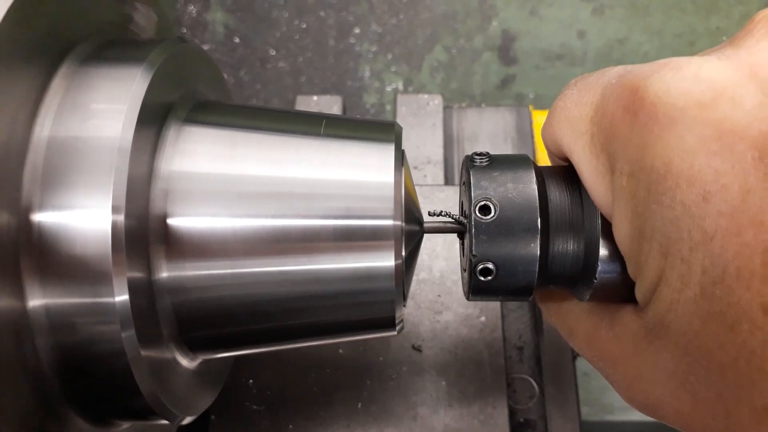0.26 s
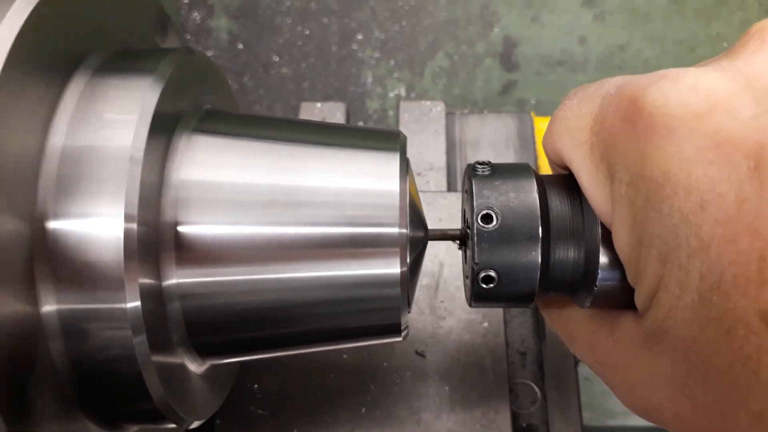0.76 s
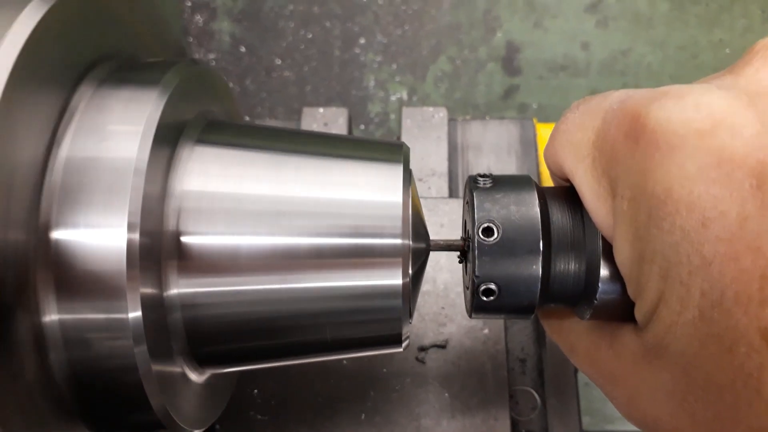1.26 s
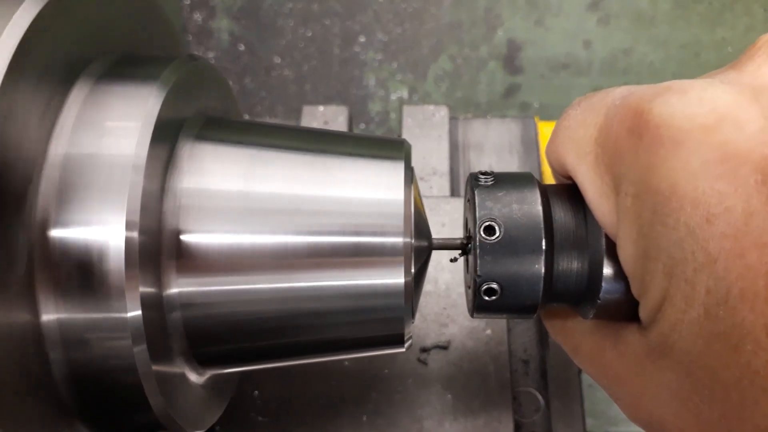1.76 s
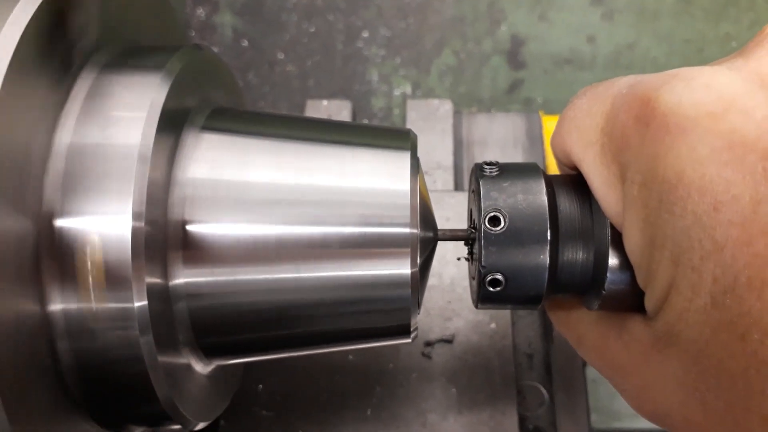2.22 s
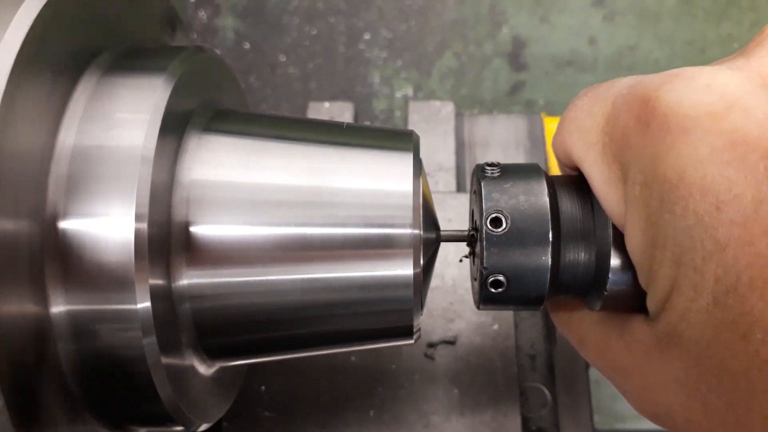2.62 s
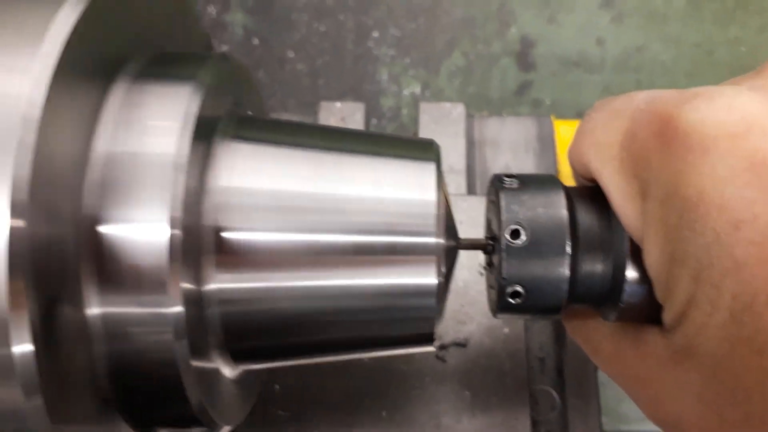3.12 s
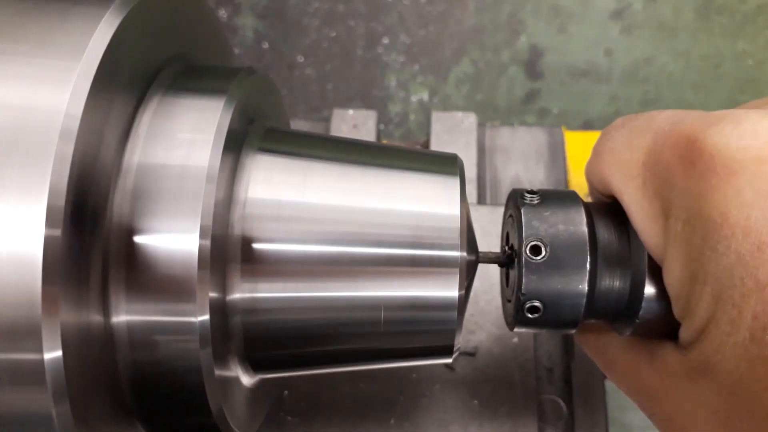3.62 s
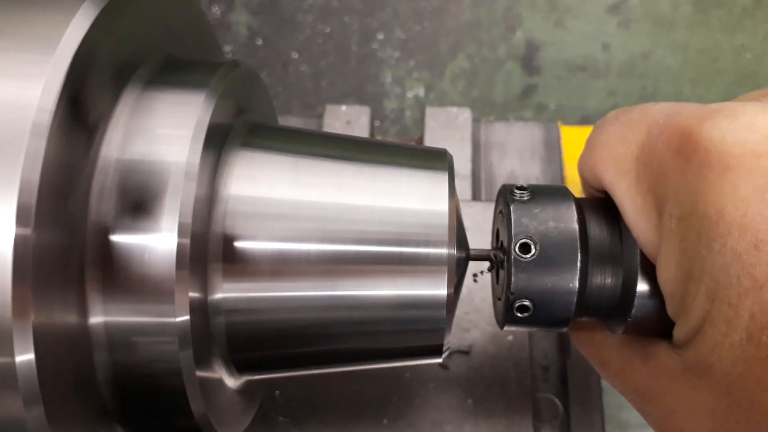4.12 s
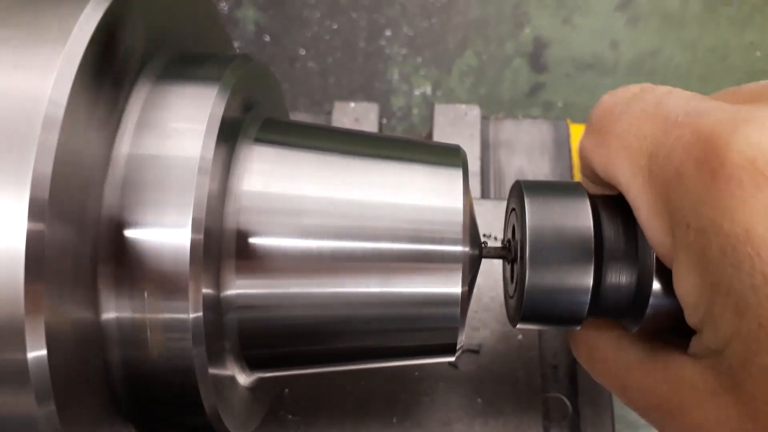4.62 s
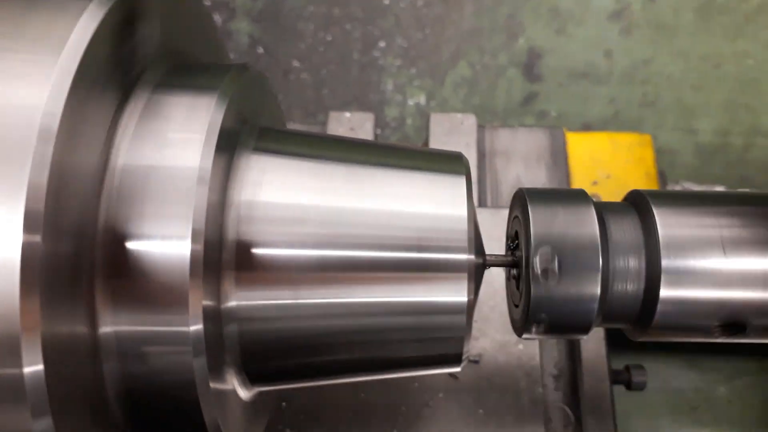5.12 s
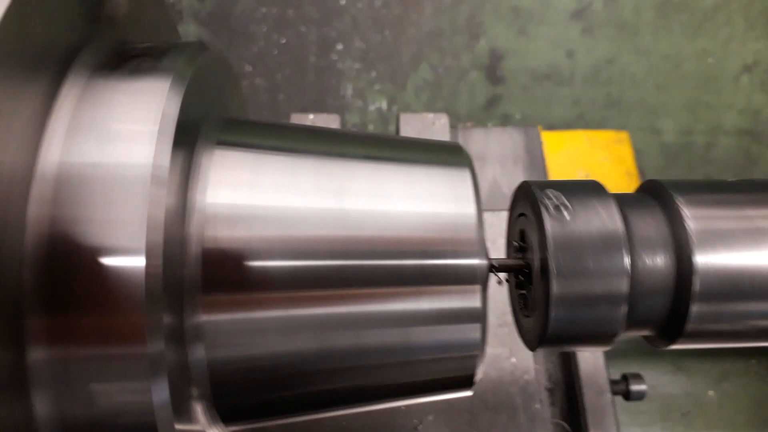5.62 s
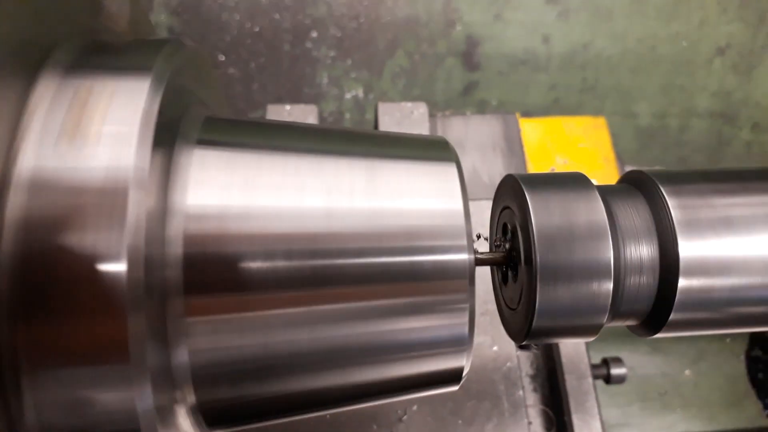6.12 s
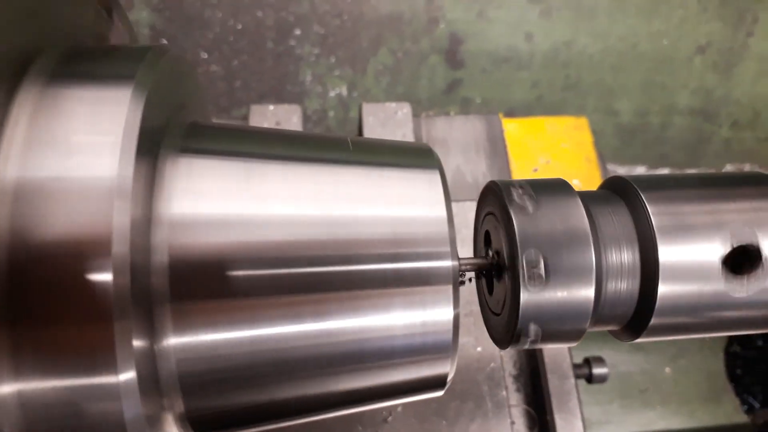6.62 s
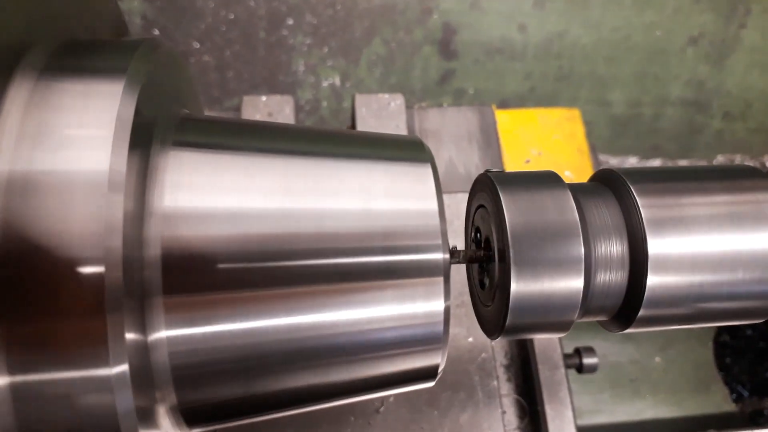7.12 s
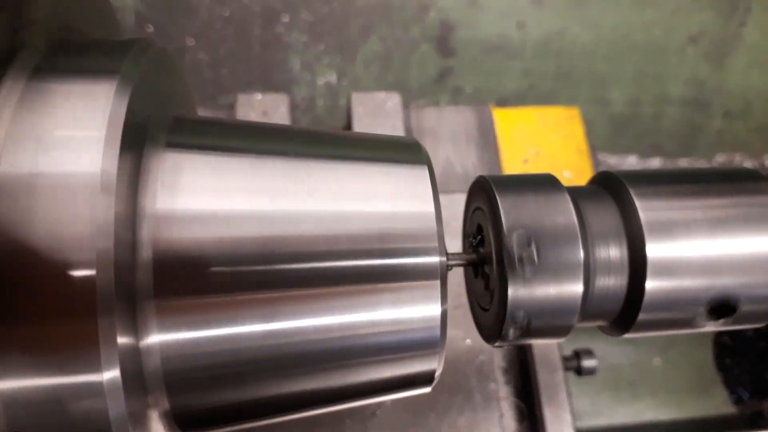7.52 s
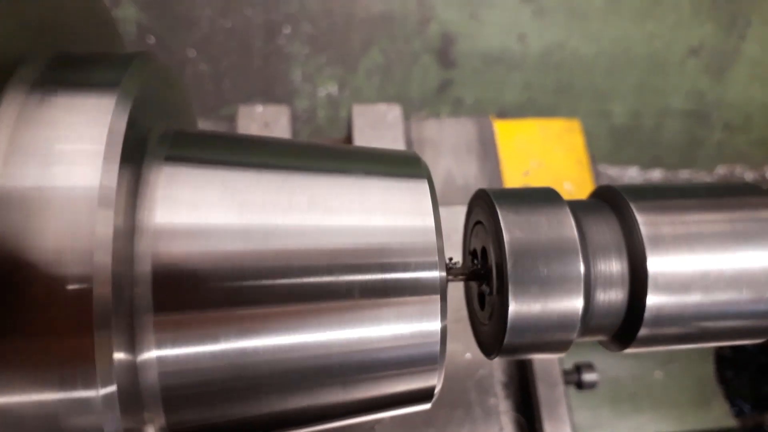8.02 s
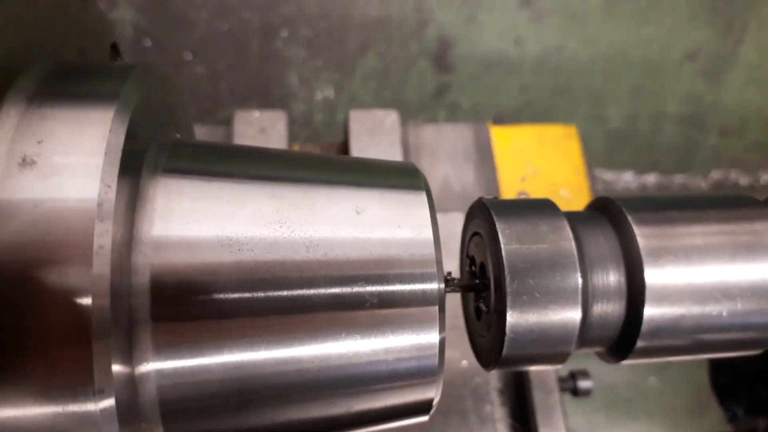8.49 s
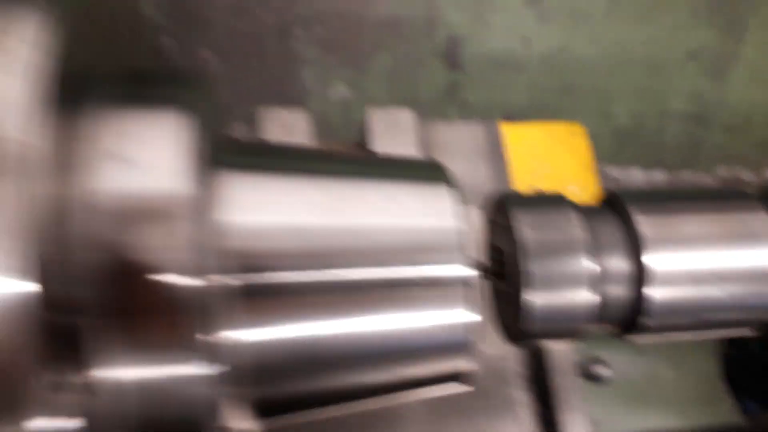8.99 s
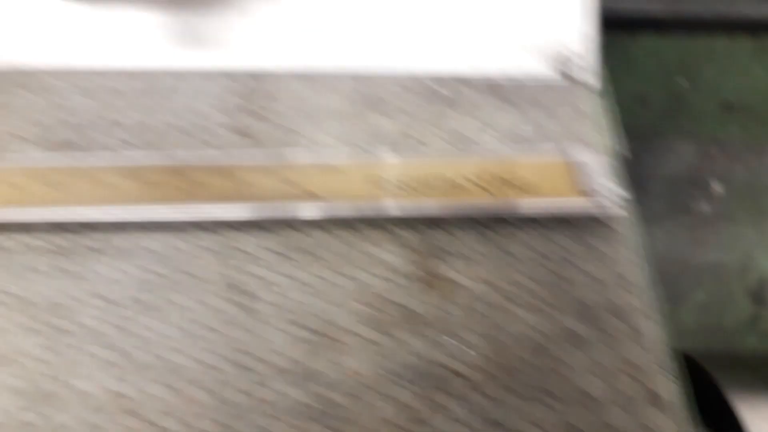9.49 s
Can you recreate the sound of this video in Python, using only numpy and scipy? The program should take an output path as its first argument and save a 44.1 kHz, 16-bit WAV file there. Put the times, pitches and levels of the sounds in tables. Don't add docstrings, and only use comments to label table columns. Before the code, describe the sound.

A small lathe hums steadily with a metallic knock about every 0.4 seconds, then the switch clacks, the motor dies and a brake pedal slams and rattles.

```python
import sys
import numpy as np
from scipy import signal
from scipy.fft import rfft, irfft
from scipy.io import wavfile
from scipy.ndimage import uniform_filter1d

SR = 44100
rng = np.random.default_rng(int(sys.argv[2]) if len(sys.argv) > 2 else 0)


def gain_from_db(level_db):
    decades = np.asarray(level_db, float) / 20
    return 10 ** decades


def wav_record(signal):
    frames = np.transpose(np.atleast_2d(signal))
    bounded = np.clip(frames, -1, 1)
    quanta = np.round(bounded * 32767).astype(np.int16)
    wavfile.write(sys.argv[1], SR, quanta)


N = 429975
SPAN = 12288
CLOCK = np.arange(N) / SR
HIT_CLOCK, HIT_HZ = np.arange(SPAN) / SR, np.fft.rfftfreq(SPAN, 1 / SR)

CUT_S = 7.69
RISE_KNOCK = 0.13
TOP_HZ = 15840

# f/Hz, level/dB [per Hz]
CUT_HISS = [(880, -33.5), (1500, -4), (1680, -3.5), (1830, -4), (2330, -1), (2580, -4), (4390, -15),
            (7590, -15.5), (9500, -40.5), (12400, -66), (20900, -120)]
# f/Hz, level/dB [per Hz]
SLAM_COLOUR = [(150, -38), (250, -10.5), (342, -24.5), (380, -8), (519, -12), (735, -7.5), (1120, -8),
               (3400, -9.5), (5000, -15.5), (7440, -13.5), (8850, -31.5), (12500, -29), (16000, -42.5)]


def unit(x):
    return x / np.sqrt(np.mean(x ** 2, -1, keepdims=True) + 1e-20)


def along(points, hz):
    f, v = np.transpose(points)
    return np.interp(np.log(hz + 1), np.log(f + 1), v)


def humps(peaks, hz):
    return sum(db / (1 + ((hz - c) / w) ** 2) for c, w, db in peaks)


def bell(hz, centre, log_width):
    return np.exp(-(np.log(hz / centre + 1e-9) / log_width) ** 2)


def wobble(rate):
    knots = rng.standard_normal(int(N * rate / SR) + 4)
    return np.interp(np.arange(N) * rate / SR, np.arange(len(knots)), knots)


def rush(gain, patchy_db):
    hz, _, z = signal.stft(rng.standard_normal(N + 512), SR, nperseg=512)
    field = uniform_filter1d(rng.standard_normal(z.shape), size=9, axis=0)
    field = uniform_filter1d(field, size=8, axis=1)
    patchy = z * gain_from_db(patchy_db * field / field.std())
    x = signal.istft(patchy, nperseg=512)[1][:N]
    return unit(irfft(rfft(x) * gain(np.fft.rfftfreq(N, 1 / SR)), N))


def strokes(rows, fade_s):
    s, rise, hold, db = np.transpose(rows)[:4, :, None]
    t = CLOCK - s
    fade = np.exp(-np.clip(t - rise - hold, 0, None) / fade_s)
    return gain_from_db(db) * np.clip(t / rise, 0, 1) * fade


def causal(db):
    cep = irfft(np.log(gain_from_db(db) + 1e-6), SPAN)
    cep = cep * np.r_[1, np.full(SPAN // 2 - 1, 2), np.zeros(SPAN // 2)]
    return np.exp(rfft(cep))


def place(times, rows):
    out = np.zeros(N + SPAN)
    fade = np.clip(4 - 4 * np.arange(SPAN) / SPAN, 0, 1)
    for s, row in zip(times, rows):
        out[round(s * SR):][:SPAN] += row * fade
    return out[:N]


def ring(hz, t60, db, swell_s=1e-5):
    turn = hz[..., None] * np.arange(SPAN) / SR
    swell = (1 - np.exp(-2 * turn)) * (1 - np.exp(-HIT_CLOCK / swell_s)) ** 2
    decay = gain_from_db(db[..., None] - 60 * HIT_CLOCK / t60[..., None])
    return decay * np.sin(2 * np.pi * turn) * swell


def contacts(db, rasp_ms, colour_db, crack, near_db, near_t60, room_db, rise=RISE_KNOCK):
    # f/Hz, t60/s
    room_decay = [(200, 0.68), (1500, 0.36), (5000, 0.3), (9000, .27), (16000, 0.22)]
    noise = rng.standard_normal((len(db), 3, SPAN))
    u = HIT_CLOCK / (np.clip(rasp_ms, 0.5, 30)[:, None] / 1000)
    rasp = np.exp(-u ** 2) * (1 - np.exp(-u / rise))
    snap = crack * np.exp(-HIT_CLOCK / 0.00043)
    clatter = gain_from_db(near_db - 60 * HIT_CLOCK / near_t60) * (1 - np.exp(-u))
    close = noise[:, 0] * (rasp + snap + clatter)

    hz, ts, z = signal.stft(noise[:, 1], SR, nperseg=256)
    tail_gain = gain_from_db(room_db - 60 * ts / along(room_decay, hz)[:, None])
    tail = signal.istft(z * tail_gain, nperseg=256)[1][:, :SPAN]
    tail = tail * (1 - np.exp(-HIT_CLOCK / 0.0067))

    lumps = uniform_filter1d(noise[:, 2, :SPAN // 2 + 1], size=90, axis=1)
    hit = irfft(rfft(close + tail) * causal(colour_db + 1.3 * unit(lumps)), SPAN)
    return hit / np.abs(hit).max(1, keepdims=True) * gain_from_db(db)[:, None]


def narrow(rows, rasp_ms, peak_db, width_hz):
    s, db, pitch = np.transpose(rows)[:3]
    colour = along(CUT_HISS, HIT_HZ) + peak_db / (1 + ((HIT_HZ - pitch[:, None]) / width_hz) ** 2)
    colour = colour - 12 / (1 + (HIT_HZ / 4200) ** 6)
    colour = colour - 10 / (1 + (8200 / (HIT_HZ + 1)) ** 12)
    return place(s, contacts(db + 3, rasp_ms, colour, crack=0.15, near_db=-10, near_t60=0.06, room_db=-20))


def blows(rows, spectrum, body, rasp_ms, crack, near_db, near_t60, room_db, knock_t60, panel_db):
    # f/Hz, level/dB, t60/s
    sheet_modes = [(1353, 1.5, 0.12), (1680, 0.5, 0.21), (2170, -4, 0.11), (2628, -7, 0.14),
                   (4280, -5.5, 0.13), (4520, -13.5, 0.23), (4840, -12.5, 0.19), (956, -4, .13),
                   (1170, -4.5, 0.11), (1940, -3, 0.11), (5960, -17.5, 0.26), (7120, -23.5, 0.22),
                   (7000, -9.5, 0.21), (7590, -23, 0.3)]
    s, db, pitch, knock_db, low_db = np.transpose(rows)
    octaves_below = np.clip(np.log2(pitch[:, None] / (HIT_HZ + 1)), 0, None)
    colour = along(spectrum, HIT_HZ) - 1.5 * octaves_below
    hit = contacts(db, np.full(len(s), rasp_ms), colour, crack, near_db, near_t60, room_db)
    hit = hit + ring(pitch, np.full(len(s), knock_t60), db + knock_db - 4.5)
    for modes, mode_db in ((sheet_modes, db + panel_db), (body, db + low_db)):
        f, g, t60 = np.transpose(modes)
        scatter = rng.standard_normal((len(s), len(f), 2))
        hz = f * (1 + 0.003 * scatter[..., 0])
        hit = hit + ring(hz, np.minimum(t60, 0.5), mode_db[:, None] + g + 1.2 * scatter[..., 1]).sum(1)
    return place(s, hit)


def motor():
    # multiple of twice the mains, level/dB
    pull = [(1, -2.5), (2, 2.5), (3, -0.5), (4, -5.5), (5, -5), (6, -16.5), (7, -15.5), (8, -7), (9, -1.5),
            (10, -7), (11, 0), (13, -4), (14, -21.5), (15, -7), (16, -20), (18, -13.5), (19, -10.5),
            (21, -18), (22, -15.5), (23, -14), (24, -13.5)]
    # t/s, share of a half wave
    phone_drift = [(0, 0), (4.5, 0), (5.6, 0.19), (5.85, 0.8), (7.1, 0.83), (7.5, 1), (7.7, 1)]
    mains2_hz, field_dies_s = 99.94, 0.039
    s, share = np.transpose(phone_drift)
    drift = np.interp(CLOCK, s, share, right=0)
    tenth_db = 14 - 6 * np.sin(np.pi * drift)
    beside_db = 4 - 4.5 * drift
    moved = {10: tenth_db, 9: beside_db, 13: beside_db}
    turn = 2 * np.pi * mains2_hz * CLOCK + 0.032 * wobble(2.2)
    hum = np.zeros(N)
    for k, db in pull:
        if k > 6:
            lag = np.pi / 2 * (k % 2) + np.pi / 40 * (k - 10) ** 2
        else:
            lag = -np.pi / 4 * (k - 3) ** 2
        hum += gain_from_db(db + moved.get(k, 0) + 1.4 * wobble(5.8)) * np.cos(k * turn - lag)
    return gain_from_db(-55) * hum * np.clip((CUT_S - CLOCK) / field_dies_s + 1, 0, 1)


def running():
    # f/Hz, level/dB [per Hz]
    gear_noise = [(35, -56.5), (60, -19), (96, -9), (145, -11), (196, -9), (248, -8), (300, -6.5),
                  (351, -11.5), (411, -3), (736, -6.5), (994, -10.5), (1220, -16), (1320, -15), (1590, -24),
                  (2600, -30.5), (3380, -58.5), (5720, -120)]
    # f/Hz, width/Hz, level/dB
    casing_peaks = [(338, 9.9, 12), (366, 8.9, -9.5), (442.3, 11, 4), (636, 110, 2), (742, 18, -13.5),
                    (1056, 21, 2), (1160, 100, 9.5), (1250, 13, -5.5), (1400, 43, 10), (1510, 33, -11),
                    (1860, 25, 2.5)]
    # f/Hz, width/Hz, level/dB
    bearing_peaks = [(1880, 50, 3.5), (2430, 80, -2), (3230, 45, 3.5), (4445, 260, -7), (5096, 200, 4),
                     (7655, 250, 8.5)]
    # f/Hz, level/dB [per Hz]
    chip_fizz = [(1470, -40.5), (2500, -13), (2720, -5), (4480, -7.5), (4990, -8.5), (6970, -7.5),
                 (7530, -1), (8800, -20), (13500, -12.5), (16000, -20)]
    # t/s, level/dB
    slide_jolts = [
        (4.47, 1.1),
        (4.68, 2.3),
        (5.48, 3.1),
        (6.69, 2.7),
    ]
    # t/s, rise/s, hold/s, level/dB
    hand_slips = [
        (.3, 0.23, 0.12, -74),
        (1.9, .15, .05, -85),
        (4.19, 0.087, 0.21, -58.5),
        (5.15, .03, 0.059, -67.5),
        (7.1, .3, .1, -78.5),
        (7.7, .05, .03, -79.5),
    ]
    # t/s, rise/s, hold/s, level/dB
    hiss_swells = [
        (7.42, 0.081, .01, -59),
        (7.64, 0.036, .005, -36),
    ]
    freed_s, stands_s, jolt_s = 4.6, 7.94, 0.18
    freed = CLOCK > freed_s
    coasting, halting = np.clip(CLOCK - CUT_S, 0, None), np.clip(CLOCK - stands_s, 0, None)

    jolt_db = sum(db * np.clip(1 - abs(CLOCK - s) / jolt_s, 0, 1) for s, db in slide_jolts)
    gear_db = -50.5 + jolt_db - 58 * coasting - 111 * halting + 0.89 * wobble(9.8)
    gears = rush(lambda f: gain_from_db(along(gear_noise, f) + humps(casing_peaks, f)), patchy_db=1.2)

    slip = strokes(hand_slips, fade_s=0.21).sum(0)
    surge = strokes(hiss_swells, fade_s=0.044).sum(0)
    cut = np.hypot(gain_from_db(-61 + 1.5 * freed - 150 * coasting), gain_from_db(-2.5) * slip) + surge
    hiss = rush(lambda f: gain_from_db(along(CUT_HISS, f) + humps(bearing_peaks, f)), patchy_db=1.5)

    chips = np.hypot(gain_from_db(-77 + 2.4 * wobble(1.5) - 35 * halting), slip)
    fizz = rush(lambda f: gain_from_db(along(chip_fizz, f)), patchy_db=2.5)

    rub = gain_from_db(-74) * freed * (CLOCK < CUT_S) * rush(lambda f: bell(f, 4100, 0.15), patchy_db=2.5)
    return rub + gain_from_db(gear_db) * gears + cut * gain_from_db(0.6 * wobble(25)) * hiss + gain_from_db(3.5) * chips * fizz


def workshop():
    # f/Hz, level/dB [per Hz]
    room_tone = [(15, -49.5), (25, -17), (43, 6.5), (64, 5), (153, -4), (293, -16), (344, -14.5),
                 (1790, -25.5), (6560, -28), (7310, -24), (8360, -33), (14800, -25.5), (16000, -27.5)]
    return gain_from_db(-66.5 + 0.9 * wobble(7.6)) * rush(lambda f: gain_from_db(along(room_tone, f)), patchy_db=1.5)


def loose_parts():
    # t/s, level/dB, settles after/ms, tips level/dB
    part_drops = [(0.445, -38, 61.5, -45), (1.2446, -37.5, 61, -42), (2.051, -36, 54, -55),
                  (2.847, -37, 55.5, -46), (3.64, -38.5, 55, -45), (4.4296, -39.5, 78, -70),
                  (5.219, -42, 65.4, -70), (6.0175, -42, 63.9, -70), (6.8233, -44, 71, -70)]
    # t/s, level/dB, f/Hz
    chip_clicks = [(0.0404, -55, 5770), (0.3264, -51, 5500), (1.1263, -49, 5700), (1.157, -58, 6670),
                   (1.6357, -56, 5600), (2.4319, -57, 5600), (.755, -46, 5700), (.7575, -54, 7600),
                   (1.555, -50, 5830), (3.146, -50, 5800), (1.408, -45, 6460), (2.755, -56, 6500),
                   (4.1487, -48, 4920), (6.5685, -51, 4820)]
    # t/s, level/dB, f/Hz, length/ms
    slide_squeaks = [
        (0.173, -58, 7690, 12),
        (2.1134, -62, 7610, 14),
        (8.0114, -58, 7590, 15),
        (8.035, -64, 7660, 33),
    ]
    tip_hz = 6800
    rows = list(chip_clicks)
    for s, db, settle_ms, tip_db in part_drops:
        rows += [(s, db, 5510), (s + settle_ms / 1000, db - 8.5, 5500), (s + 0.303, tip_db, tip_hz)]
    s, db, pitch = np.transpose(rows)
    clicks = gain_from_db(-5.5) * narrow(rows, np.full(len(rows), 1.6), peak_db=19, width_hz=560)
    ring_db = db + 4.5 - 9 * (pitch == tip_hz)
    t60 = np.full(len(s), 0.009)
    rings = sum(ring(pitch * apart, t60, ring_db + g, swell_s=0.00036)
                for apart, g in ((0.92, -7), (1.03, -8.5), (1.31, -10)))
    squeaks = narrow(slide_squeaks, np.transpose(slide_squeaks)[3], peak_db=33, width_hz=370)
    return clicks + place(s, rings) + squeaks


def die_holder():
    # t/s, level/dB, seats within/ms, rebound after/ms, rebound level/dB
    turn_ticks = [(0.218, -31, 4.1, 27, -39), (0.6148, -30.5, 3.8, 27.5, -33.5),
                  (1.0201, -30, 5.1, 24, -40.5), (1.415, -31, 4.3, 26, -35.5),
                  (1.8197, -30.5, 2.7, 8.1, -31), (2.221, -27.5, 2.8, 29, -32.5),
                  (2.618, -30, 2.4, 9.2, -30), (3.0221, -28, 4, 22, -33), (3.413, -32, 4.7, 12, -29.5),
                  (3.8217, -29, 4.4, 20.5, -30), (4.211, -29.5, 2.8, 14, -26.5),
                  (4.6121, -27, 5.5, 26, -28.5), (5.002, -30.5, 2.9, 2.8, -26.5),
                  (5.402, -26.5, 3.7, 24, -29), (5.7944, -30, 3.3, 12, -26.5),
                  (6.2058, -28, 3.9, 24.6, -27.5), (6.597, -27, 1.8, 11, -27.5),
                  (7.011, -26.5, 5.3, 26, -25.5), (7.403, -28, 2.1, 8.7, -31.5)]
    # f/Hz, level/dB [per Hz]
    steel_colour = [(160, -37), (280, 8), (1010, -0.5), (1500, -8), (3260, -10.5), (3800, -13.5),
                    (6520, -2), (7730, -7), (9000, -24.5), (13500, -21), (16000, -33)]
    # f/Hz, width/Hz, level/dB
    holder_peaks = [(1817, 67, 0.5), (2300, 55, 2.5), (3260, 94, 0.5), (4720, 120, 1.5), (5900, 840, -4.5),
                    (6400, 160, -2.5), (7170, 120, 3), (7496, 78, 6.5)]
    # f/Hz, knock level/dB, rebound level/dB, t60/s
    holder_modes = [(312, -25, -24, .09), (441, -20, -23, 0.17), (1730, -16, -26, 0.036),
                    (2304, -18, -14, .035), (3276, -13, -15, 0.035), (5000, -12.5, -19, 0.024),
                    (5650, -20, -13, 0.036), (6470, -4, -7, 0.024), (6900, -15, -1, 0.032)]
    first, first_db, seat_ms, after_ms, again_db = np.transpose(turn_ticks)
    count = len(first)
    s, db = np.r_[first, first + after_ms / 1000], np.r_[first_db, again_db]
    rasp_ms = np.r_[seat_ms, np.full(count, 4.86)]
    body_db = np.repeat([-8.5, -10], count)[:, None]
    crack = np.repeat([0.5, 0.04], count)[:, None]
    rise = np.repeat([RISE_KNOCK, 0.3], count)[:, None]

    colour = along(steel_colour, HIT_HZ) + humps(holder_peaks, HIT_HZ)
    colour = colour + (body_db + 14.5) / (1 + (HIT_HZ / 3600) ** 6)
    colour = colour - 13 / (1 + (HIT_HZ / 1450) ** 8)
    hit = contacts(db + 1, rasp_ms, colour, crack, near_db=-6, near_t60=0.085, room_db=-13, rise=rise)

    f, knock_db, rebound_db, t60 = np.transpose(holder_modes)
    mode_db = np.repeat([knock_db, rebound_db], count, axis=0)
    mode_db = db[:, None] + mode_db + 1.9 * rng.standard_normal((len(s), len(f)))
    swell_s = rise[..., None] * rasp_ms[:, None, None] / 2000
    return place(s, hit + ring(f, t60, mode_db, swell_s).sum(1))


def lever():
    # t/s, level/dB, knock f/Hz, knock level/dB, cabinet thump level/dB
    grip_hits = [
        (6.6891, -39, 980, -13, -10),
        (6.6966, -34, 1370, 4.5, -20),
        (7.0808, -30.5, 910, 3, -14),
        (7.0855, -29.5, 3420, -3, -13),
        (7.0882, -26, 3200, -1, -21),
        (7.0907, -25.5, 816, 0, -16),
        (7.094, -32.5, 2700, -4, -21),
        (7.1005, -34, 653, 12, -5),
    ]
    tap_hits = [
        (7.4785, -27, 2270, -7.5, -30),
        (7.486, -43, 1010, 3, -16),
        (7.5148, -41, 2110, 3, -10.5),
    ]
    latch_hits = [(7.6286, -49.5, 973, -8, -7), (7.6389, -24.5, 1250, -8, -4.5),
                  (7.6435, -31, 4300, -3.5, -0.5), (7.65, -21.5, 1700, -0.5, 1),
                  (7.6555, -28, 4320, -3, -1.5), (7.6675, -7, 4100, 3, -40.5), (7.6678, -7, 1330, 9, -28),
                  (7.67, -11.5, 1330, 2.5, -30), (7.6735, -15, 2300, -2, -30),
                  (7.6844, -18.5, 1900, -3.5, -16), (7.6905, -24, 2198, -2, -24),
                  (7.7008, -27, 7340, -1, -16), (7.7065, -27, 7000, -0.5, -21.5)]
    spring_hits = [
        (7.8562, -26.5, 1760, -11, -20),
        (7.8595, -31.5, 4350, -9, -34),
        (7.8623, -25, 2240, -10, -42),
        (7.8665, -31, 1170, -8, -24),
        (7.872, -40, 446, 2, -30),
        (7.9044, -36.5, 1380, -3, -15),
    ]
    # f/Hz, level/dB [per Hz]
    knuckle_colour = [(240, -34), (400, -6), (750, -2), (1000, -9.5), (1500, -11), (2400, -14),
                      (3350, -11.5), (4600, -18), (7600, -28), (16000, -39)]
    clack_colour = [(150, -46.5), (250, -23), (686, -8.5), (748, -13), (955, -3.5), (1350, -6.5),
                    (1550, -4), (2200, -6.5), (3170, -13.5), (4340, -4), (6140, -16.5), (7570, -11),
                    (8850, -26.5), (16000, -31)]
    twang_colour = [(150, -44), (250, -13), (460, -3), (800, -16), (1140, -8.5), (2240, -9.5),
                    (4120, -16.5), (6820, -5.5), (8700, -24), (10200, -24), (16000, -30)]
    # f/Hz, level/dB, t60/s
    housing = [(100, -14.5, 0.57), (125.8, -7.5, 0.25), (158, -2.5, 0.16), (201, 0, 0.1)]
    grip = blows(grip_hits, knuckle_colour, housing, rasp_ms=3.1, crack=0.68, near_db=-10, near_t60=0.16,
                 room_db=-15.5, knock_t60=0.034, panel_db=-27)
    taps = blows(tap_hits, SLAM_COLOUR, housing, rasp_ms=0.8, crack=2.2, near_db=-8.5, near_t60=0.09,
                 room_db=-18.5, knock_t60=0.044, panel_db=-29)
    latch = blows(latch_hits, clack_colour, housing, rasp_ms=3.3, crack=2.5, near_db=-6, near_t60=0.14,
                  room_db=-16, knock_t60=0.0065, panel_db=-21.5)
    back = blows(spring_hits, twang_colour, housing, rasp_ms=2.9, crack=1.4, near_db=-9.5, near_t60=0.1,
                 room_db=-16.5, knock_t60=0.079, panel_db=-31)
    return grip + taps + latch + back


def pedal():
    # t/s, rise/s, hold/s, level/dB
    door_groan = [
        (7.87, 0.028, .12, -65),
        (8.55, .06, 0.064, -75),
    ]
    # t/s, rise/s, hold/s, level/dB
    slide_down = [
        (8.205, 0.027, 0.042, -65),
    ]
    # f/Hz, width/Hz, level/dB
    slide_bands = [(780, 204, 7.5), (1350, 200, 6.4), (3100, 450, 11), (4800, 300, 9), (7200, 700, 8.4)]
    # t/s, level/dB, knock f/Hz, knock level/dB, cabinet thump level/dB
    pedal_hits = [(8.2736, -14.5, 1440, -10, -46), (8.2775, -14.5, 3300, -8, -11),
                  (8.2932, -18, 670, -3, -19), (8.2965, -19.5, 2150, -9, -17),
                  (8.3103, -23, 1000, -10, -20), (8.32, -29, 765, 4, -20), (8.328, -16.5, 3420, -10, -29),
                  (8.332, -21.5, 2600, -7, -5.5), (8.3465, -26, 700, 2, -20), (8.353, -26.5, 2120, -1, -14),
                  (8.3647, -27, 1520, -5, -1), (8.376, -25, 724, 1, -11), (8.381, -36, 7660, -17, -20),
                  (8.3845, -26.5, 1870, -9, -10), (8.389, -33, 3700, -11, 5),
                  (8.4015, -30.5, 757, 6.5, -17), (8.409, -33.5, 1400, 0, 1), (8.418, -38, 2800, -1, -3),
                  (8.4288, -37, 740, 9, -10), (8.444, -41.5, 764, 8.5, -4), (8.468, -48, 725, 10, 1),
                  (8.496, -51, 5680, -9, 4), (8.8039, -54, 880, -13, -18)]
    # f/Hz, level/dB, t60/s
    cabinet_modes = [(92.5, -7.5, 0.3), (140, 6.5, 0.096), (185.8, -2, 0.08), (383.4, -8, 0.11),
                     (502, -11, 0.058)]
    groan = strokes(door_groan, fade_s=0.07).sum(0)
    groan = groan * rush(lambda f: np.exp(-((f - 350) / 90) ** 2), patchy_db=3)
    travel = strokes(slide_down, fade_s=0.01)[0]
    travel = travel * rush(lambda f: gain_from_db(humps(slide_bands, f)) * (f < 8300), patchy_db=5.5)
    slam = blows(pedal_hits, SLAM_COLOUR, cabinet_modes, rasp_ms=1.5, crack=1.96, near_db=-4.5, near_t60=0.085,
                 room_db=-11.5, knock_t60=0.045, panel_db=-25)
    return groan + travel + gain_from_db(1.5) * slam


def sleeve():
    # f/Hz, width as log ratio
    cloth_bands = [(7200, 0.085), (5150, 0.14), (2050, 0.12), (2800, 0.96)]
    # t/s, rise/s, hold/s, level/dB, dull part/dB, broad part/dB
    brush_strokes = [
        (8.801, 0.002, 0.052, -78.5, -5, 4),
        (8.925, 0.007, 0.02, -71, -18, -4),
        (8.97, .01, 0.027, -74, -18, -4),
        (9.712, 0.004, .012, -63, -7, -12),
        (9.725, 0.02, .03, -61, -20, -15),
    ]
    *bands, broad = [rush(lambda f: bell(f, hz, wide * np.sqrt(2)), patchy_db=2) for hz, wide in cloth_bands]
    dull_db, broad_db = np.transpose(brush_strokes)[4:]
    gains = strokes(brush_strokes, fade_s=0.041)
    out = gain_from_db(broad_db) @ gains * broad
    for share, band in zip((0, 0.4, 1), bands):
        out = out + gain_from_db(share * dull_db) @ gains * band
    return out


def scene():
    mono = motor() + running() + workshop() + loose_parts() + die_holder() + lever() + pedal() + sleeve()
    return np.array([mono, mono])


def top_cut(x):
    return signal.sosfilt(signal.butter(12, 16670, fs=SR, output="sos"), x)


def record(dry):
    # f/Hz, level/dB [per Hz]
    port_hiss = [(30, 5), (150, 0), (400, -1.5), (16000, 2)]
    hz = np.fft.rfftfreq(N, 1 / SR)
    low_cut = (1j * hz / (1j * hz + 63.7)) ** 4
    band = low_cut / (1 + (hz / TOP_HZ) ** 160)
    mid = irfft(rfft(dry[0]) * band, N)
    side = gain_from_db(-79.5) * rush(lambda f: gain_from_db(along(port_hiss, f)) * (f < TOP_HZ), patchy_db=2)
    return top_cut(np.array([mid + side, mid - side]))


dry = scene()
out = record(dry)
wav_record(out)
```